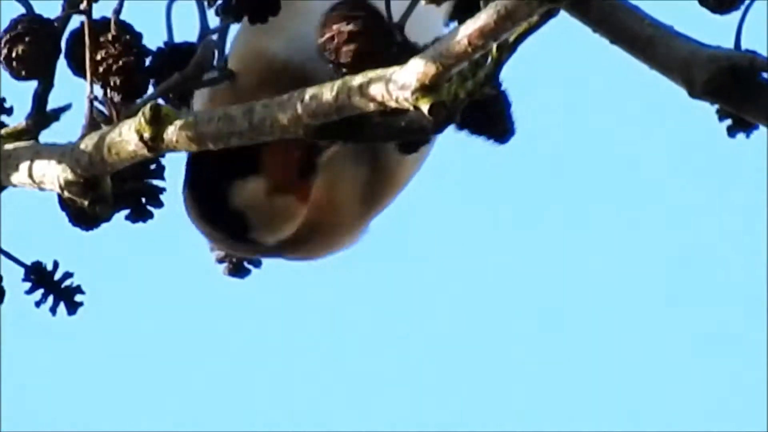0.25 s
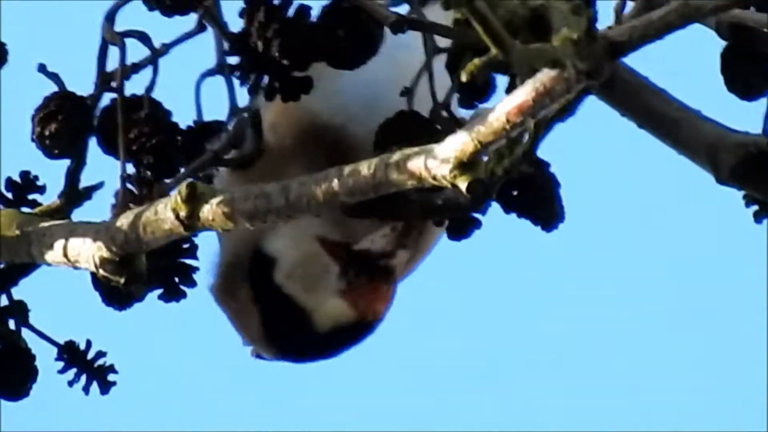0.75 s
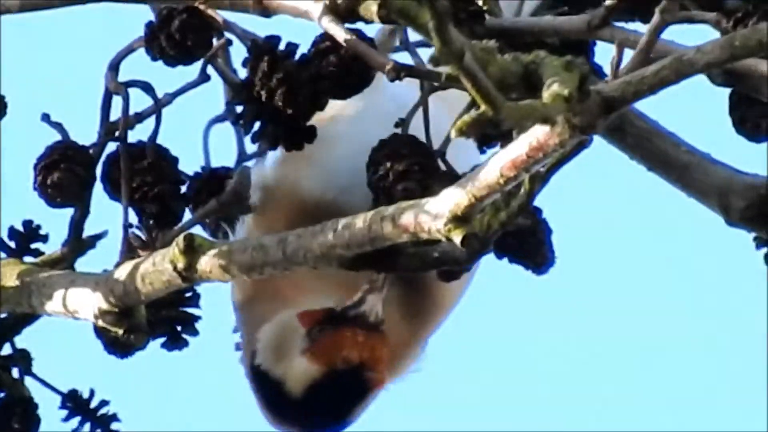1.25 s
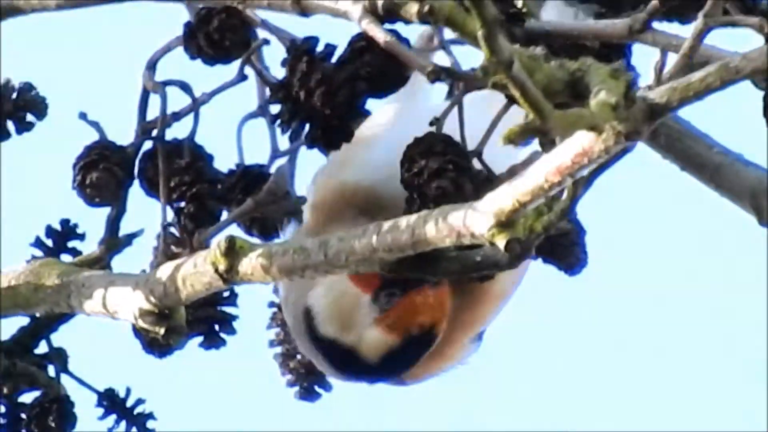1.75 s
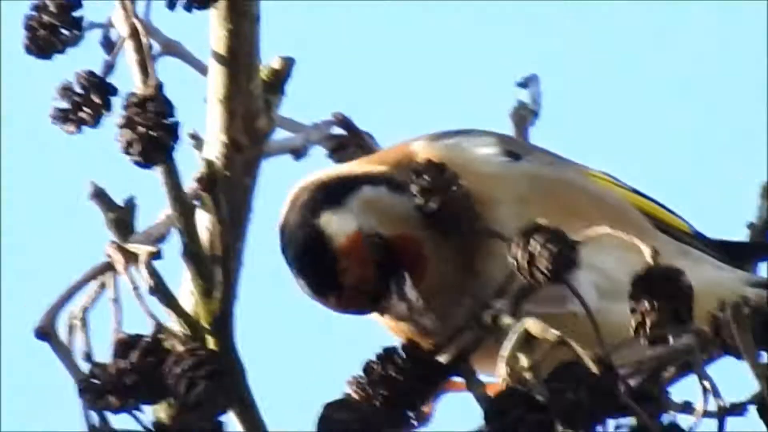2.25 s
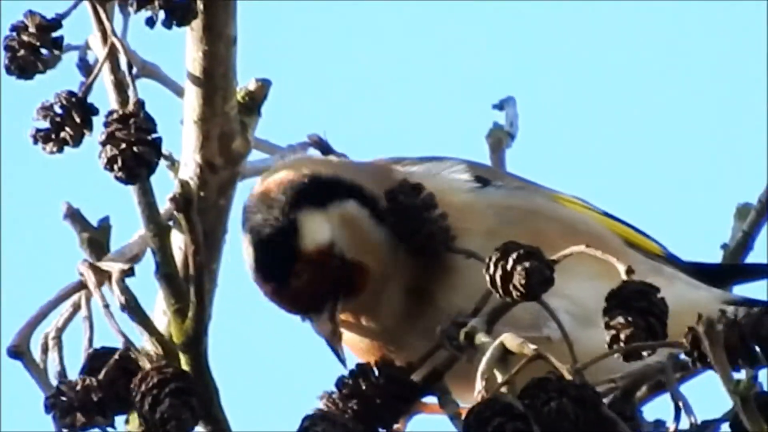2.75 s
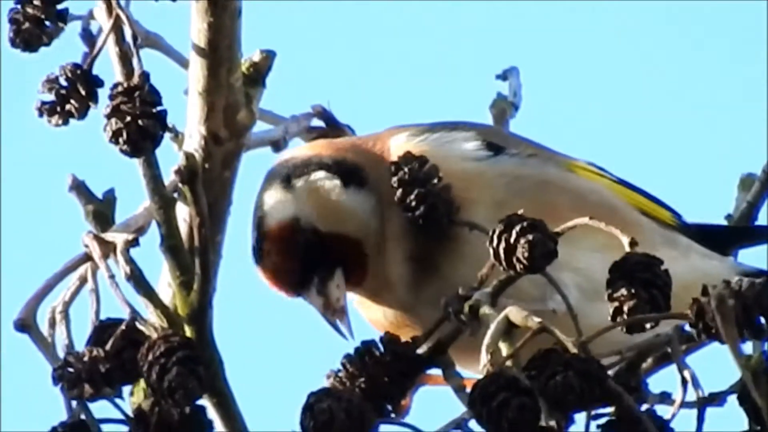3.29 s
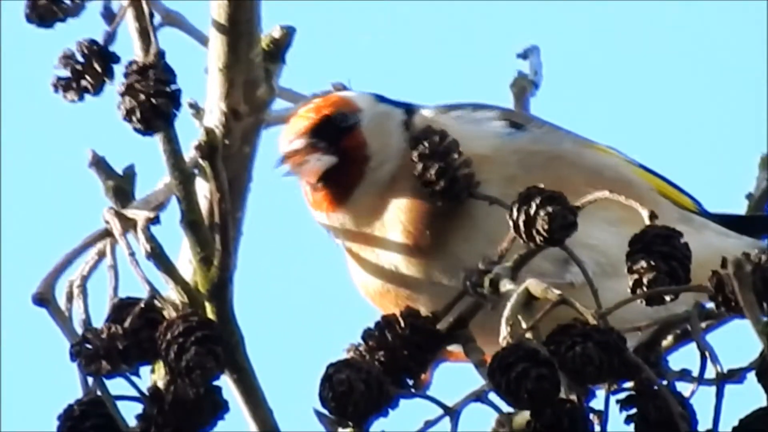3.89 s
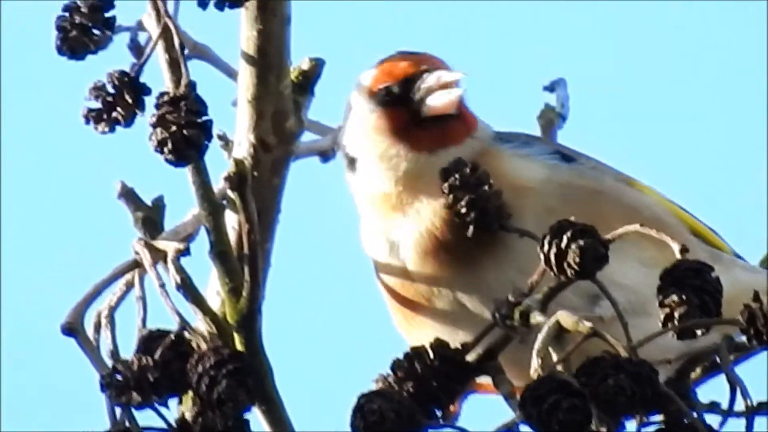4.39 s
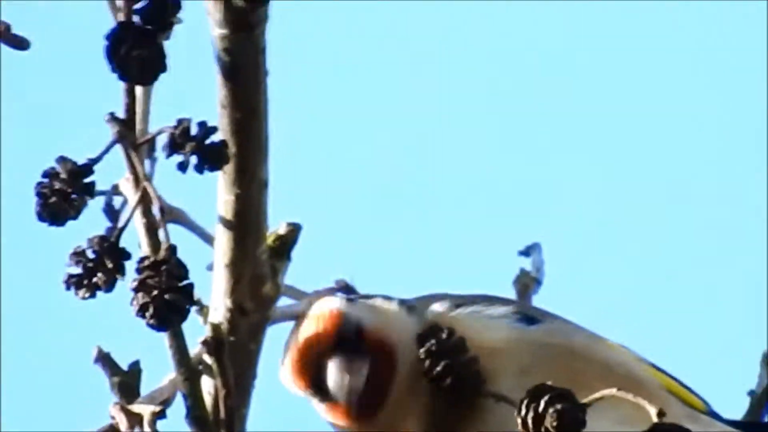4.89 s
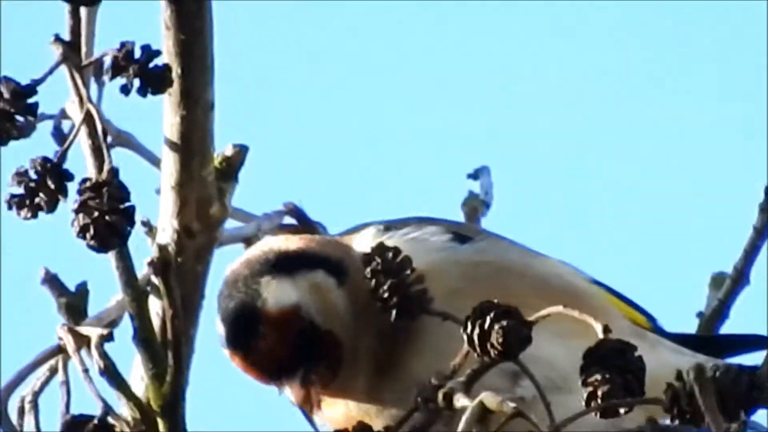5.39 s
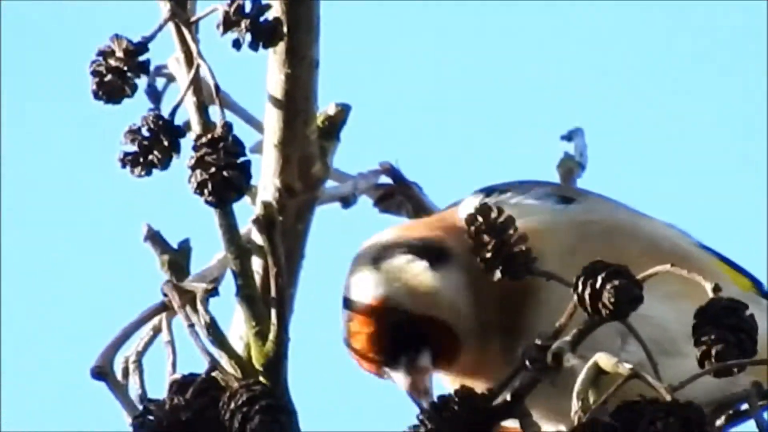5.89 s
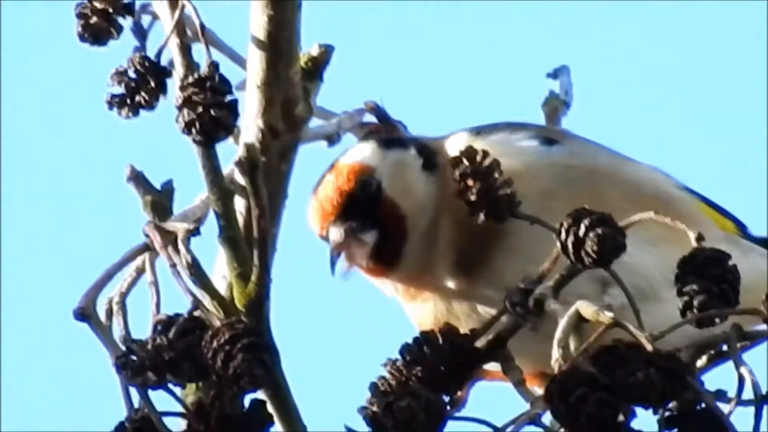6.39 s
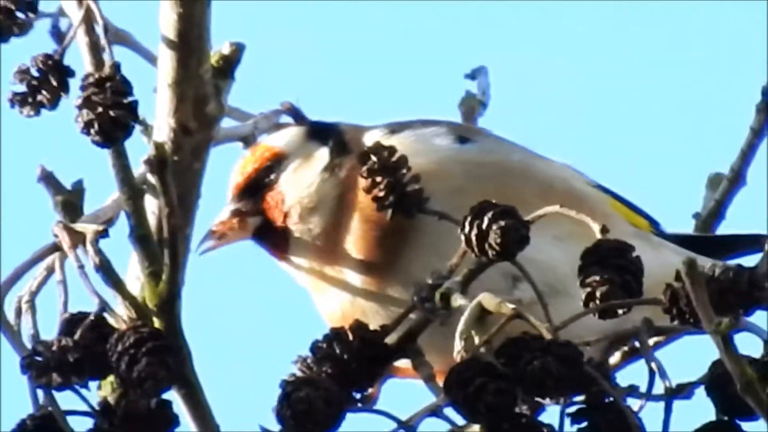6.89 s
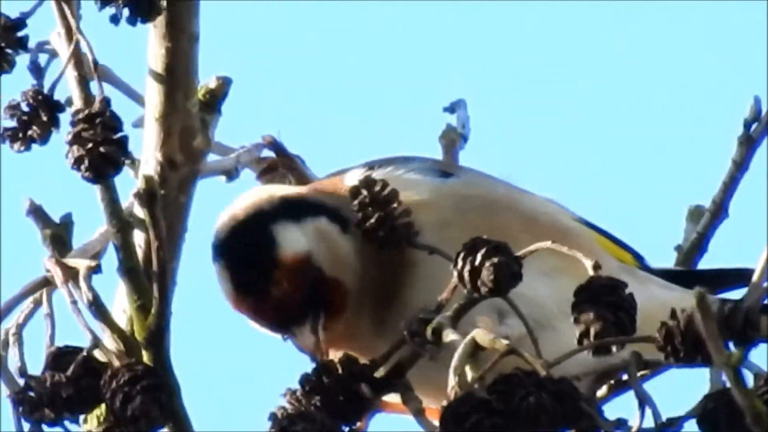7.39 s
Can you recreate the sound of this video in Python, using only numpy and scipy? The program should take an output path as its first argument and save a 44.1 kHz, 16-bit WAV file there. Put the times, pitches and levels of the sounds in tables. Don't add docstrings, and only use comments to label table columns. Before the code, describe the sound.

A small bird repeats a quick low-high whistled song amid twitters and beak ticks over distant traffic, fades to silence, then sparser chirps return.

```python
import sys
import numpy as np
from scipy import signal
from scipy.fft import rfft, irfft
from scipy.io import wavfile
from scipy.ndimage import uniform_filter1d

SR = 44100
rng = np.random.default_rng(int(sys.argv[2]) if len(sys.argv) > 2 else 0)


def output_pcm(signal):
    pcm = np.clip(np.atleast_2d(signal).T, -1, 1) * 32767
    wavfile.write(sys.argv[1], SR, np.round(pcm).astype(np.int16))


def invert_db(level):
    return 10 ** (np.asarray(level, dtype=float) / 20)


N = 337365
T = np.arange(N) / SR
HZ = np.arange(N // 2 + 1) * SR / N + 1e-9
SINGER_PAN_DB = 5.5


def on_hz(table, col):
    rows = np.array(table, float)
    return np.interp(np.log(HZ), np.log(rows[:, 0]), rows[:, col])


def hump(hz, octaves):
    return np.exp(-0.5 * (np.log2(HZ / hz) / octaves) ** 2)


def walk(rate):
    k = int(SR / rate)
    held = np.repeat(rng.standard_normal(N // k + 1), k)
    return 0.69 * uniform_filter1d(uniform_filter1d(held, k), k)[:N]


def add(out, s, sound, pan_db):
    i = int(s * SR)
    part = sound[:N - i]
    out[:, i:i + len(part)] += part * invert_db(np.array([[pan_db], [-pan_db]]) / 2)


def whistle(hz, db, edge_s, flutter_db):
    t = np.arange(len(hz)) / SR
    to_edge_s = np.minimum(t, t[-1] - t)
    ends = np.sin(np.pi / 2 * np.clip(to_edge_s / edge_s, 0, 1)) ** 2
    noise = rng.standard_normal((2, len(t)))
    waver, flutter = 15 * uniform_filter1d(uniform_filter1d(noise, size=160), size=160)
    phase = 2 * np.pi * np.cumsum(hz * (1 + 0.0033 * waver)) / SR
    return np.sqrt(2) * invert_db(db + flutter_db * flutter) * ends * np.sin(phase)


def bent_notes(table, edge_s, pan_db, warp=0.96, rise_db=0, dip_db=0, release_db=0, flutter_db=1):
    out = np.zeros((2, N))
    for s, length, first_hz, mid_hz, last_hz, db in table:
        u = np.linspace(0, 1, int(length * SR))
        curve = np.polyfit([0, 0.5, 1], [first_hz, mid_hz, last_hz], deg=2)
        bend_hz = np.polyval(curve, u ** warp)
        effort_db = db - rise_db * (1 - u)
        effort_db = effort_db - dip_db * np.exp(-((u - 0.4) / 0.2) ** 2)
        effort_db = effort_db - release_db * np.clip((u - 0.65) / 0.33, 0, 1)
        add(out, s, whistle(bend_hz, effort_db, edge_s, flutter_db), pan_db)
    return out


def alike(table, hz):
    return [(s, length, *hz, db) for s, length, db in table]


def glides(table, share):
    return [(s, length, a, a + share * (b - a), b, db) for s, length, a, b, db in table]


def grove(dry, wet_db):
    t = np.arange(int(1.5 * SR)) / SR
    grain = rng.standard_normal((2, len(t))) * invert_db(2.8 * rng.exponential(size=(2, len(t))))
    late, early = invert_db(-60 * t / 1.0), 1.6 * invert_db(-60 * t / 0.18)
    tail = grain * (late + early) * np.clip(t / 0.00084, 0, 1)
    tail = 0.71 * tail + 0.68 * tail[:1]
    tail *= invert_db(wet_db) / np.sqrt(np.mean(np.sum(tail ** 2, axis=1)))
    echoes = signal.fftconvolve(dry.mean(axis=0, keepdims=True), tail, axes=1)[:, :N]
    return dry + echoes * invert_db(2.0 * walk(70))


def song():
    # start_s, length_s, level_db
    low_notes = [
        (0, 0.081, -38),
        (.287, 0.11, -36),
        (.586, 0.1, -34),
        (.886, 0.11, -33.5),
        (1.193, .118, -36.5),
        (1.508, .11, -35.5),
        (1.832, .11, -33.5),
    ]
    # start_s, length_s, level_db
    high_notes = [
        (.089, 0.09, -53),
        (.389, 0.08, -48),
        (.687, 0.082, -47.5),
        (.991, 0.096, -46.5),
        (1.3, 0.12, -50.5),
        (1.613, 0.093, -50),
        (1.936, .087, -47.5),
    ]
    low_hz, high_hz = (3910, 4173, 4237), (5740, 5155, 4890)
    low = bent_notes(alike(low_notes, low_hz), 0.0096, SINGER_PAN_DB, warp=0.745,
                     rise_db=10, dip_db=2.5, release_db=10.5, flutter_db=0.5)
    high = bent_notes(alike(high_notes, high_hz), 0.0064, SINGER_PAN_DB, warp=0.62,
                      rise_db=-2.5, dip_db=6.0, release_db=5.5)
    return grove(low + high, -4.5)


def diffuse():
    # frequency_hz, likeness_0_to_1, left_minus_right_db
    port_table = [(60, .983, 0), (290, .965, 0), (700, .94, 0), (1290, .87, 4.5), (2380, .72, 3),
                  (4400, .55, 2), (7000, .3, .5), (15000, .1, 0)]
    a, b = rfft(rng.standard_normal((2, N)))
    like, tilt = on_hz(port_table, 1), invert_db(on_hz(port_table, 2) / 2)
    lag_s = 3.5e-5
    right = like * a * np.exp(-2j * np.pi * HZ * lag_s) + np.sqrt(1 - like ** 2) * b
    return np.array([a * tilt, right / tilt])


def band(hz, octaves, db, flicker_db, rate):
    noise = irfft(diffuse() * hump(hz, octaves), N) * invert_db(flicker_db * walk(rate))
    return noise / np.sqrt(np.mean(noise ** 2)) * invert_db(db)


def traffic(flow_db):
    # frequency_hz, density_db_per_hz
    roar_spectrum = [(24, -29), (40, -19), (62, 0.5), (85, -4), (129, -11.5), (195, -7.5), (480, -10.5),
                     (800, -12), (1400, -15.5), (1650, -22), (2800, -30), (6700, -33.5), (8520, -46.5),
                     (15500, -58.5)]
    colour = diffuse() * invert_db(on_hz(roar_spectrum, 1))
    gain = invert_db(-37) / np.std(irfft(colour, N))
    swell_db = 0.8 * walk(5) + 0.34 * walk(12)
    rumble_db = 1.7 * walk(3.8)
    humps = [hump(hz, 0.5) for hz in 32 * 2.0 ** np.arange(10)]
    total = sum(humps) + 1e-12
    out = 0
    for k, h in enumerate(humps):
        slow_db = flow_db if k > 1 else rumble_db
        out = out + irfft(colour * h / total, N) * invert_db(slow_db + swell_db + 0.83 * walk(8.6))
    return gain * out


def road():
    # time_s, level_db
    flow_table = [(0, -0.5), (.9, 0), (1.5, -3), (2.2, 0.3), (3, -2.5), (3.5, 1), (4.2, -2.5), (5.2, 0.4),
                  (5.8, -0.4), (6.4, 2), (7.65, 1)]
    flow_db = np.interp(T, *np.transpose(flow_table))
    tyres = band(1145, 0.2, -43.5 + flow_db, 2.9, 9.4)
    return traffic(0.097 * flow_db) + tyres


def flock():
    chance = rng.random((200, 5))
    start_s, length_s = chance[:, 0] * T[-1], 0.012 + 0.0296 * chance[:, 3]
    first_hz = 3300 + 420 * chance[:, 1]
    glide_hz = 300 * (chance[:, 2] - 0.45)
    table = np.transpose([start_s, length_s, first_hz, first_hz + glide_hz / 2, first_hz + glide_hz,
                          -8 * chance[:, 4]])
    calls = grove(bent_notes(table, 0.0048, 3.0, flutter_db=4.5), 2.7)
    flock_db = -62 - 1.5 * np.maximum(T - 6.3, 0)
    blur = band(3466, 0.093, flock_db + 2.0, 1.4, 25) + band(2174, 0.07, flock_db - 0.5, 2.1, 8.1)
    return calls * invert_db(flock_db - 4.0) + blur


def twigs():
    # time_s, level_db
    breeze_table = [
        (0, -82),
        (1.2, -72),
        (2.2, -62),
        (2.5, -71.5),
        (3.5, -55.5),
        (4.2, -53),
        (5.2, -53),
        (5.8, -55),
        (7.65, -60),
    ]
    breeze_db = np.interp(T, *np.transpose(breeze_table))
    return band(5420, 0.34, breeze_db - 2.0, 0.74, 9) + band(6400, 0.13, breeze_db - 4.5, 1.1, 9)


def reducer(x):
    hz, _, z = signal.stft(x, SR, nperseg=2048, noverlap=1536)
    power = uniform_filter1d(np.mean(np.abs(z) ** 2, axis=0), size=3, axis=1) + 1e-20
    usual = np.median(power, axis=1, keepdims=True)
    usual = usual * np.clip(hz[:, None] / 250, 0, 1)
    gain = power / (power + 0.68 * usual)
    return signal.istft(z * gain, nperseg=2048, noverlap=1536)[1][:, :N]


def chatter():
    # start_s, length_s, first_hz, last_hz, level_db
    chatter_calls = [(.017, 0.017, 7400, 7150, -61), (.018, .01, 6200, 6240, -49),
                     (.023, 0.026, 5150, 5650, -59), (.045, .03, 4400, 4730, -59),
                     (.08, .045, 4150, 4280, -53), (.145, .04, 3440, 3580, -58.5),
                     (.178, 0.038, 5500, 5470, -53), (.342, .041, 5950, 5740, -51),
                     (.345, .035, 4950, 4720, -58), (.49, .09, 3830, 3750, -65),
                     (.573, .021, 3460, 4020, -50), (.725, .033, 4700, 4540, -58),
                     (.82, 0.039, 5270, 5640, -56.5), (.906, .037, 4400, 4500, -55),
                     (1.0, .165, 3850, 3770, -59.5), (1.215, 0.038, 4680, 4500, -59.5),
                     (1.285, 0.033, 4340, 4100, -60), (1.47, .038, 3680, 3640, -53),
                     (1.575, .13, 3850, 3740, -58), (1.783, .032, 4700, 4700, -56.5),
                     (1.828, .027, 4530, 4500, -52)]
    calls = bent_notes(glides(chatter_calls, 0.56), 0.004, SINGER_PAN_DB, flutter_db=3.0)
    return grove(calls, -5.0)


def ticks():
    # start_s, peak_db, ring_hz, ring_over_snap_db, left_minus_right_db
    cone_ticks = [
        (.2535, -34.5, 6440, 25, 4),
        (0.667, -38, 6300, 21, 5),
        (1.2555, -27, 4720, 4.5, 8),
        (1.3945, -54, 7050, 9, -4),
        (1.452, -32.5, 6760, 23, 6),
        (1.542, -40, 6000, 29, 7),
        (1.756, -49, 6960, 14, 3),
        (1.869, -38, 5900, 20, 0.5),
        (2.06, -53, 6000, -5, -2),
        (5.2495, -38.5, 4580, 16, -7),
    ]
    out = np.zeros((2, N))
    t, hz = np.arange(1024) / SR, np.arange(1, 514) * SR / 1024
    body = hz ** 4 / (hz ** 4 + 2400.0 ** 4) / (1 + (hz / 12000) ** 12) / (1 + hz / 7000)
    late = np.exp(2j * np.pi * 3.0e4 / np.maximum(hz, 2500))
    for s, db, ring_hz, ring_db, pan_db in cone_ticks:
        ring = invert_db(ring_db) / (1 + 1j * (hz - ring_hz) / 330)
        rattle = (t == 0) + 0.092 * rng.standard_normal(len(t)) * invert_db(-60 * t / 0.012)
        snap = irfft(rfft(rattle) * body * (1 + ring) * late)
        add(out, s, snap * invert_db(db) / np.abs(snap).max(), pan_db)
    return grove(out, -22)


def fader():
    silent_s, return_s = 2.222, 2.317
    down = 0.94 * np.clip(1 - T / silent_s, 0, 1)
    up = np.clip((T - return_s) / 2.14, 0, 1) ** 0.92
    return (0.013 + down + up) * ((T < silent_s) | (T > return_s))


def single_calls():
    # start_s, length_s, first_hz, last_hz, level_db
    flick_calls = [(2.318, .025, 3470, 3880, -53), (2.706, 0.02, 3360, 4020, -53),
                   (2.948, 0.02, 3360, 4300, -61), (3.1, .011, 5300, 5570, -53),
                   (4.35, .01, 4700, 5200, -59), (4.822, 0.017, 3450, 3930, -57),
                   (5.165, .0116, 6300, 7040, -54), (5.275, .012, 6650, 7060, -62),
                   (5.61, 0.024, 6700, 7250, -61), (6.874, .024, 5380, 5680, -51),
                   (7.124, 0.0165, 3200, 3790, -52), (7.124, 0.029, 3280, 5050, -57),
                   (7.282, .018, 3460, 3750, -49), (7.471, .011, 3480, 3770, -50),
                   (7.471, 0.028, 3420, 5150, -53)]
    fall_calls = [
        (5.195, .013, 7100, 6420, -50),
        (5.284, 0.038, 7120, 6250, -49),
        (5.316, .038, 6130, 5400, -58),
        (6.806, .075, 5840, 5430, -50.5),
        (7.387, 0.021, 6300, 5840, -53),
    ]
    droop_calls = [
        (4.805, 0.11, 5200, 5560, -60.5),
        (5.161, .077, 5780, 5500, -58),
        (6.271, 0.057, 4090, 4520, -59),
    ]
    peep_calls = [
        (3.19, .042, 3250, 3420, -55.5),
        (3.218, .071, 7700, 9200, -75),
        (3.241, 0.06, 4200, 4580, -52),
        (3.46, .044, 4050, 4150, -65),
        (6.837, .045, 3650, 3480, -58),
        (6.89, 0.082, 3310, 3300, -66),
        (7.084, .044, 4430, 4540, -59),
        (7.358, 0.048, 4110, 4410, -55.5),
        (7.503, .024, 2710, 2800, -58),
        (7.59, .034, 2830, 2780, -62),
    ]
    right_droops = [
        (2.537, .057, 7700, 6780, -58),
    ]
    right_scoops = [
        (3.0, .1, 5900, 5500, -50),
        (6.378, .02, 7700, 7340, -60),
        (6.396, 0.013, 6720, 6680, -50),
        (6.41, 0.024, 7350, 6500, -58),
    ]
    right_pan_db = -9
    # calls, share of the glide done by the middle, left_minus_right_db
    kinds = [(fall_calls, 0.5, 12), (droop_calls, 0.217, -1.5), (peep_calls, 0.72, 4.5),
             (right_droops, 0.217, right_pan_db), (right_scoops, 0.7, right_pan_db)]
    out = bent_notes(glides(flick_calls, 0.5), 0.0039, 5.5, rise_db=-2.0, flutter_db=2.8)
    for table, share, pan_db in kinds:
        out = out + bent_notes(glides(table, share), 0.005, pan_db,
                               rise_db=6.0, release_db=-1.0, flutter_db=3.0)
    return grove(out, -9.5)


def trills():
    # first_top_s, length_s, first_centre_hz, last_centre_hz, level_db
    trill_notes = [
        (5.4285, .118, 6000, 6520, -47.5),
        (5.6625, .202, 6800, 6760, -52),
    ]
    # swings_per_s, louder_at_top_db, left_minus_right_db
    trill_manner = [
        (34.7, 17, 9),
        (32.8, -4, 6),
    ]
    out = np.zeros((2, N))
    lead_s = 0.009
    for (top_s, length, first_hz, last_hz, db), (rate, top_db, pan_db) in zip(trill_notes, trill_manner):
        t = np.arange(int(length * SR)) / SR
        turn = 2 * np.pi * rate * (t - lead_s)
        swing = np.cos(turn + 0.456 * (np.cos(turn) - 1))
        hz = first_hz + (last_hz - first_hz) * t / length + 394 * swing
        swing_db = top_db * (swing - np.sign(top_db)) / 2
        add(out, top_s - lead_s, whistle(hz, db + swing_db, 0.0065, 1.2), pan_db)
    return grove(out, -10)


def scene():
    background = reducer(road() + flock() + twigs())
    return song() + background + chatter() + ticks() + single_calls() + trills()


def top_cut(x):
    return signal.sosfilt(signal.butter(12, 15700, fs=SR, output="sos"), x)


def record(dry):
    low_pass = signal.ellip(8, 0.2, 70, 15700, fs=SR, output="sos")
    mix = signal.sosfilt(low_pass, dry * fader())
    return top_cut(mix)


dry = scene()
out = record(dry)
output_pcm(out)
```